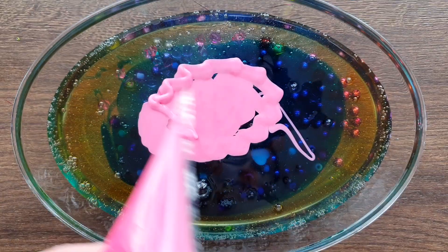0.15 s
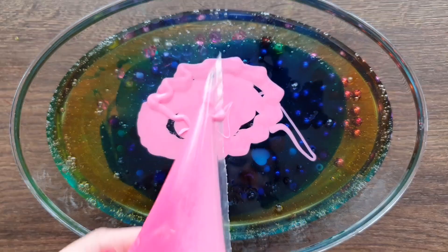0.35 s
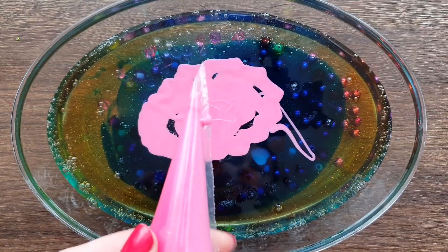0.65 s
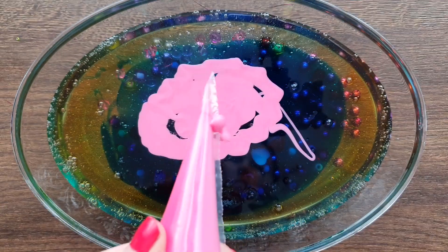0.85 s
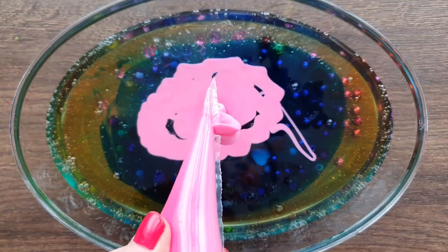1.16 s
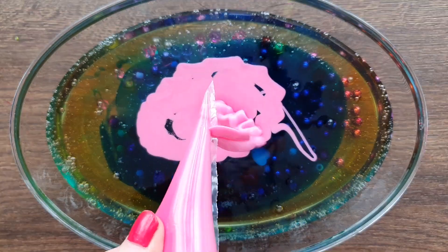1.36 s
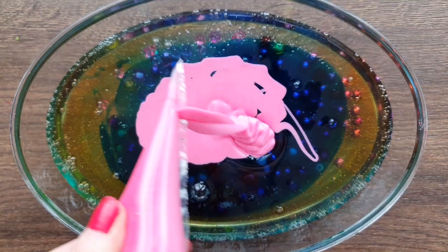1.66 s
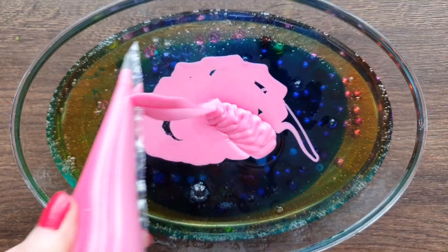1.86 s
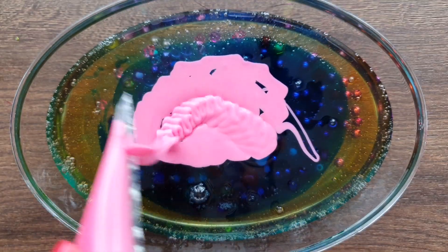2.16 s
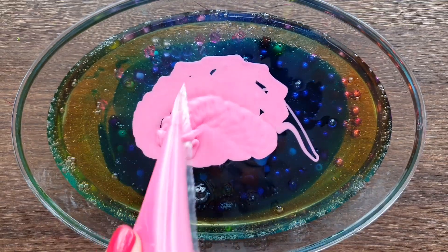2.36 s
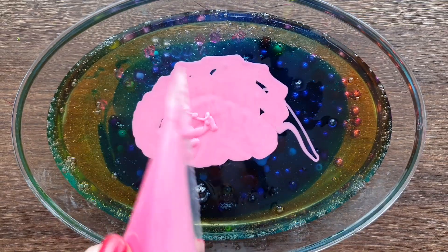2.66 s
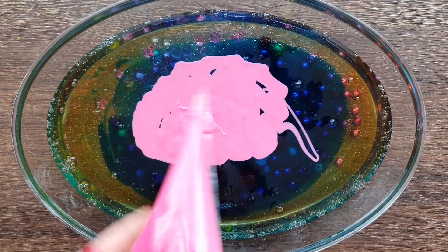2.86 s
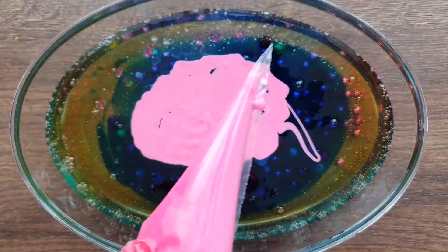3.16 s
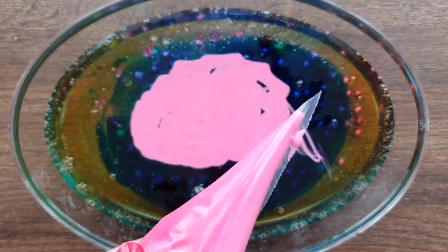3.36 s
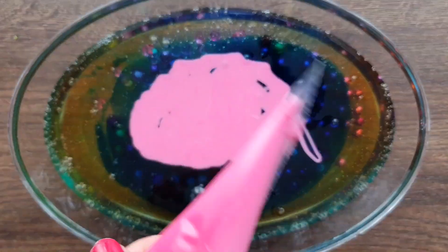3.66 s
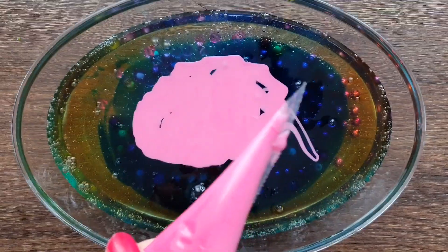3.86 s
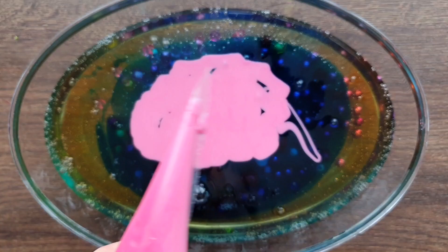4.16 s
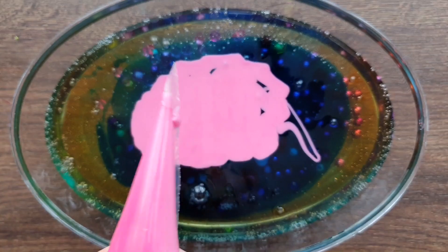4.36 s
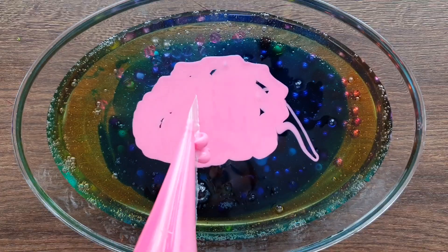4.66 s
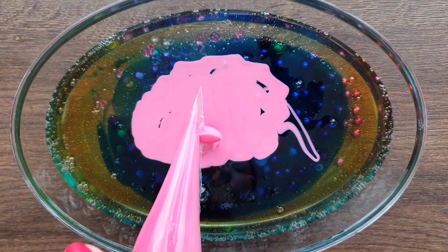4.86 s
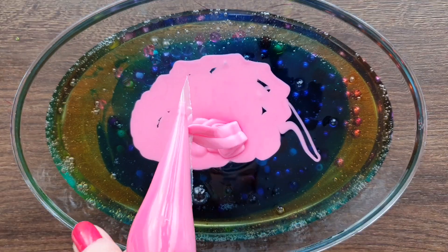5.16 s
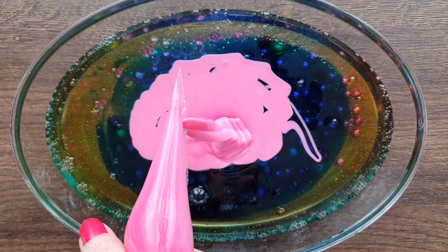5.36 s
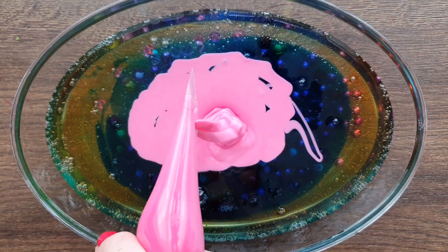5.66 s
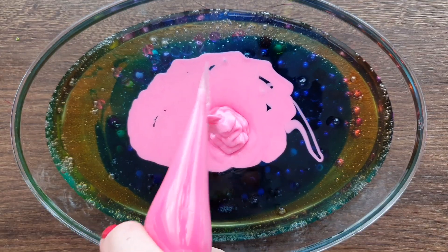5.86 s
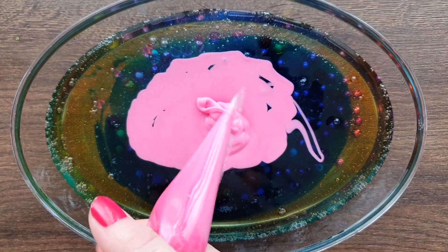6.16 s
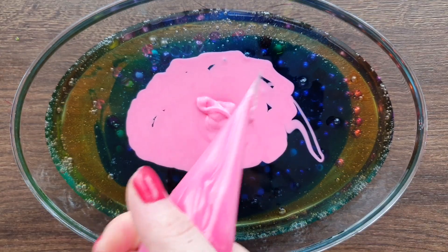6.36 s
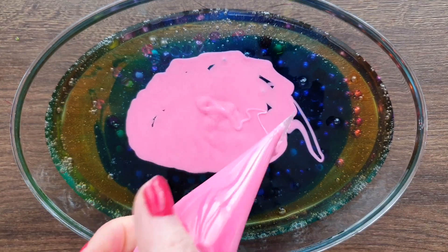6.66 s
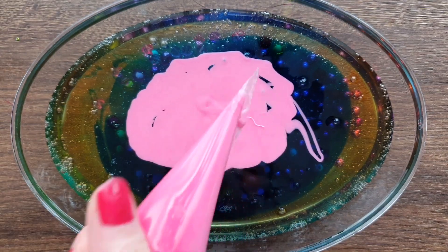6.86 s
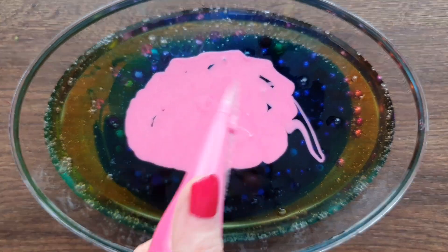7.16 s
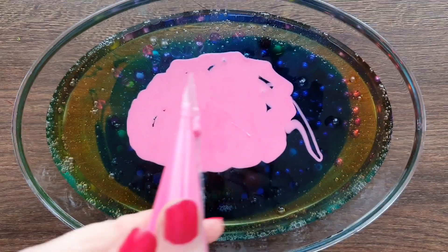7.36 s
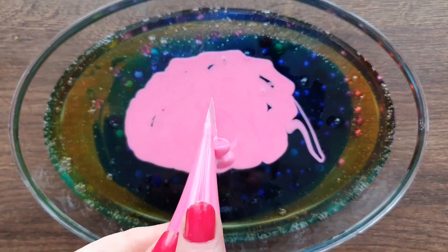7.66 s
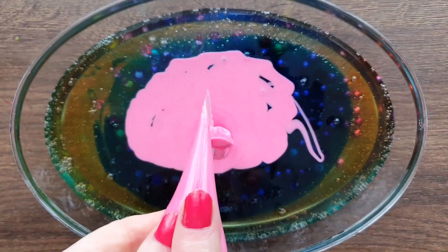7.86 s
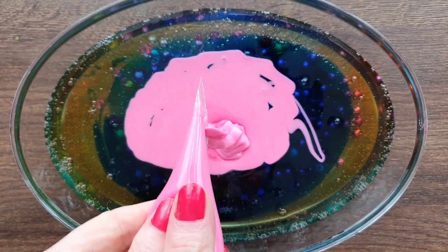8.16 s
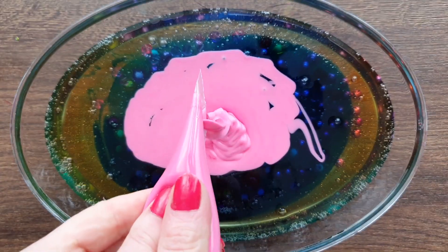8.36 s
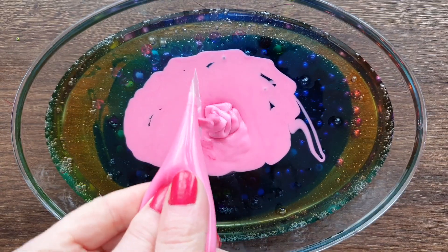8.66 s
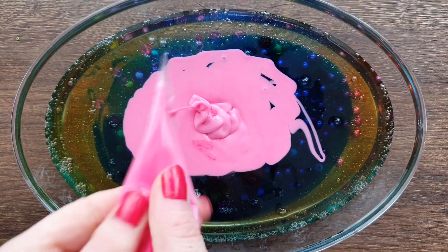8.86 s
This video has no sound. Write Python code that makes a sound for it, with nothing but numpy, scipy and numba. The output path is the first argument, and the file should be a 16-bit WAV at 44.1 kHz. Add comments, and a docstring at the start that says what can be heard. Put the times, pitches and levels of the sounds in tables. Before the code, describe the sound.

Thin plastic film ticks and rustles in scattered bursts close by, then one very loud sharp double crack, over a faint distant motor hum.

```python
"""A thin plastic piping bag is kneaded by hand just left of a stereo microphone, over a glass bowl on a table.
Creases in the film buckle as short ticks over a fine rustle, all built from damped sines; a taut fold cracks
loudly in runs of slips. The paste plops, fingers squeak, and noise-driven low modes make the table shudder.
Decaying noise bands form a small room's echo; a motor hums far off in harmonics over quiet shaped noise."""
import sys
import numpy as np
from scipy import signal
from scipy.fft import rfft, irfft, next_fast_len
from scipy.io import wavfile
from scipy.ndimage import uniform_filter1d
from numba import njit

SR = 44100
rng = np.random.default_rng(int(sys.argv[2]) if len(sys.argv) > 2 else 0)


def log_audio(samples):
    """Write samples as a 16-bit WAV file to the path given in sys.argv[1]."""
    # one column per channel
    frames = np.atleast_2d(samples).T
    # limit to full scale, then quantise
    limited = np.clip(frames, -1, 1)
    pcm = np.round(limited * 32767).astype(np.int16)
    wavfile.write(sys.argv[1], SR, pcm)


N = 397782  # length in samples


def undb(db):
    """Decibels to gain."""
    return 10 ** (np.asarray(db) / 20)


def curve(rows):
    """Draw each column of a time table as a sample-by-sample line."""
    s, *columns = np.transpose(rows)
    return [np.interp(np.arange(N) / SR, s, c) for c in columns]


def band(x, hz, width):
    """Resonant band-pass, gain 1 at the centre."""
    return signal.lfilter(*signal.iirpeak(min(hz, .45 * SR), hz / width, SR), x)


def walk(rate):
    """Random levels held 1 / rate s and smoothed twice; spread near 1."""
    hold = int(SR / rate)
    steps = np.repeat(rng.standard_normal(N // hold + 1), hold)
    return 1.395 * uniform_filter1d(uniform_filter1d(steps, hold), hold)[:N]


def swells(s, start, held, rise, fall):
    """Level in dB below full of each attack-hold-release shape at times s, one column per shape."""
    s = s[:, None]
    return -rise * np.maximum(start - s, 0) - fall * np.maximum(s - start - held, 0)


@njit
def ring(start, hz, t60, size, turn, rise_s, n):
    """Sum of damped sines, each a rotating, shrinking phasor with a smooth rise."""
    out = np.zeros(n)
    for k in range(len(start)):
        rotation = np.exp(2j * np.pi * hz[k] / SR - np.log(1000.) / (t60[k] * SR))
        phasor = size[k] * np.exp(1j * turn[k])
        first, rise = 0., 0.
        step = min(2 / (rise_s[k] * SR), 1.)
        for i in range(max(start[k], 0), min(start[k] + int(.8 * t60[k] * SR), n)):
            first += (1 - first) * step
            rise += (first - rise) * step
            out[i] += rise * phasor.imag
            phasor *= rotation
    return out


RIGHT_LAG_S = 0.00018


def heard(s, hz, t60, db, pan_db, rephase=1.2, lag_s=RIGHT_LAG_S, rise_cycles=1., longest_rise_s=.0005):
    """Damped grains at both ports: the right one hears them later, re-phased, and panned by level."""
    s, hz, t60, db, pan_db = (np.ravel(v) * 1. for v in np.broadcast_arrays(s, hz, t60, db, pan_db))
    turn = rng.uniform(0, 2 * np.pi, len(s))
    right_turn = turn + rephase * rng.standard_normal(len(s))
    hz = np.minimum(hz, .45 * SR)
    rise_s = np.minimum(rise_cycles / hz, longest_rise_s)
    left_start = (s * SR).astype(np.int64)
    right_start = ((s + lag_s) * SR).astype(np.int64)
    left = ring(left_start, hz, t60, undb(db + pan_db / 2), turn, rise_s, N)
    right = ring(right_start, hz, t60, undb(db - pan_db / 2), right_turn, rise_s, N)
    return np.array([left, right])


# Patches jolted by one crease: three of film, two of the filled body, three small ones.
# Each row: gain in dB added to the crease's own level, t60 in seconds before a random stretch.
CREASE_PATCHES = [(9, 0.0043), (7, 0.0038), (6.5, 0.0046), (4, 0.0074), (5, 0.0023), (11.5, 0.00084),
                  (-3, 0.0036), (-13.5, 0.016)]


def buckle(s, db, hz, below_db, above_db, body_db, body_hz, high_db, pan_db, spread_s):
    """Each crease jolts the film at and around its pitch, the filled body below and small patches above."""
    count = len(CREASE_PATCHES)
    u, wait, last = np.moveaxis(rng.random((len(s), 3, count)), 1, 0)
    below = 0.62 + 0.23 * u[:, 1]
    above = 1.176 + 0.33 * u[:, 2]
    deep = 0.37 + 0.4 * u[:, 4]
    small_hz = 8000 * 2 ** ((np.arange(3) + u[:, 5:]) / 3)  # one in each third of the octave
    pitch = np.column_stack([hz, hz * below, hz * above, body_hz, body_hz * deep, small_hz])
    patch_db, t60 = np.transpose(CREASE_PATCHES)
    level_db = np.column_stack([db, below_db, above_db, body_db, body_db, high_db, high_db, high_db])
    # the first patch is on time, the others trail at random
    late = -spread_s * np.log(1 - .95 * wait) * (np.arange(count) > 0)
    return heard(s[:, None] + late, pitch, t60 * (0.71 + 0.74 * last), level_db + patch_db,
                 pan_db[:, None], rise_cycles=1.47, longest_rise_s=0.00031)


# Where the hand holds the bag.
# Each row: time in seconds, left minus right in dB, pitch of the filled body in Hz.
HAND_GRIP = [(0, 4, 1800), (.7, 5.5, 1580), (2.45, 6.5, 2130), (3.5, 16, 2000), (4.2, 14.5, 2500),
             (6.0, 9, 2240), (6.38, 8.5, 2410), (6.8, 12, 2410), (7.1, 9.5, 2630), (7.4, 2, 1660),
             (9.02, 2.5, 1766)]


def grip(s):
    """Stereo place and body pitch at times s, gliding from one hold to the next."""
    t, pan_db, hz = np.transpose(HAND_GRIP)
    return np.interp(s, t, pan_db), np.interp(s, t, hz)


# Shifts of the fingers that rustle the film; grain, scatter and patch gains add to the levels.
# Each row: full from in seconds, held in seconds, film level in dB, film pitch in Hz before scatter,
# body level in dB, high part level in dB.
FINGER_SHIFTS = [(0.0, 0.11, -60.5, 5100, -70, -54), (.135, 0.01, -61.5, 6860, -75, -63),
                 (.274, 0.044, -64.5, 5900, -70.5, -73), (0.558, 0.012, -62.5, 5000, -63, -57.5),
                 (0.631, 0.015, -59, 4300, -73, -89), (.94, 0.009, -75.5, 4330, -77, -95),
                 (2.37, .03, -74, 4700, -84, -74), (2.433, 0.069, -56.5, 5280, -57, -58),
                 (2.55, 0.12, -63.5, 5800, -72.5, -69), (2.817, 0.0066, -61.5, 5850, -81, -83),
                 (3.0, 0.022, -74, 5500, -72, -99), (3.16, 0.054, -79, 5470, -76, -82),
                 (3.315, 0.0066, -76.5, 3550, -92, -74), (3.489, 0.0062, -67, 3840, -93, -72),
                 (3.7, .25, -80.5, 4030, -89, -78), (4.01, 0.11, -70.5, 5000, -71.5, -91),
                 (4.12, 0.034, -66.5, 4700, -64, -63.5), (4.3, 0.14, -74.5, 4300, -78, -97),
                 (5.32, 0.08, -94, 4080, -98, -69.5), (5.676, 0.027, -72.5, 5230, -84, -70),
                 (5.98, .06, -66, 4900, -94, -89), (6.07, 0.046, -50, 3800, -56, -48.5),
                 (6.2, .06, -57.5, 4200, -70, -57), (6.3, 0.054, -57, 4300, -62, -51),
                 (6.57, 0.038, -63.5, 5100, -72, -66), (6.691, 0.023, -58.5, 4330, -61, -60.5),
                 (6.78, 0.11, -63, 4600, -64.5, -61.5), (6.95, 0.068, -60, 5330, -65, -61),
                 (7.054, 0.0088, -52, 5660, -50, -50), (7.087, 0.006, -56.5, 5930, -52, -62),
                 (7.34, 0.026, -70.5, 4900, -68, -85), (7.6, 0.0094, -73, 5140, -69, -89),
                 (7.859, 0.014, -73, 5270, -70, -64.5), (6.372, 0.018, -59.5, 3960, -65, -65),
                 (7.95, .11, -70, 6400, -75, -66), (8.21, 0.043, -79, 4860, -71.5, -61),
                 (8.58, 0.078, -82.5, 6200, -79, -65.5), (8.75, 0.066, -69, 4750, -85, -61),
                 (8.84, 0.12, -52.5, 4900, -58, -59)]
SHIFT_RISE_DB_S, SHIFT_FALL_DB_S = 436, 218
SWARM_BELOW_DB, SWARM_ABOVE_DB = -1, 0  # film below and above its pitch, re the film level
RUSTLE_PAN_DB = 3.5  # further left than the grip
RUSTLE_SCATTER_DB = 3.5  # scale of the random boost per grain


def swarm(count, grain_db, spread_s):
    """Creases at random times; the strongest finger shift of the moment sets their size and pitch."""
    start, held, db, hz, body_db, high_db = np.transpose(FINGER_SHIFTS)
    chance = rng.random((count, 4))
    s = chance[:, 0] * N / SR
    shape = swells(s, start, held, SHIFT_RISE_DB_S, SHIFT_FALL_DB_S)
    k = np.argmax(shape + np.maximum(db, high_db), axis=1)
    boost_db = -RUSTLE_SCATTER_DB * np.log(1 - .96 * chance[:, 1])
    size_db = shape[np.arange(count), k] + grain_db + boost_db
    pan_db, body_hz = grip(s)
    film_hz = hz[k] * 2.19 ** (chance[:, 2] - .5)
    body_hz = body_hz * 1.59 ** (chance[:, 3] - .5)
    film_db = db[k] + size_db
    return buckle(s, film_db, film_hz, film_db + SWARM_BELOW_DB, film_db + SWARM_ABOVE_DB,
                  body_db[k] + size_db, body_hz, high_db[k] + size_db, pan_db + RUSTLE_PAN_DB, spread_s)


def rustle():
    """A dense swarm of tiny creases and a sparse one of stronger, tighter ticks."""
    fine = swarm(count=11000, grain_db=-12.5, spread_s=0.0027)
    ticks = swarm(count=1000, grain_db=-6.5, spread_s=0.00072)
    return fine + ticks


# Low resonances of the table.
# Each row: pitch in Hz, width in Hz, level in dB relative to the other mode.
TABLE_MODES = [(46, 20, -3.5), (78, 24, 0)]
# Knocks through the table.
# Each row: full from in seconds, held in seconds, level in dB.
TABLE_KNOCKS = [(1.2, 0.25, -83), (4.48, 0.018, -70), (6.31, 0.14, -55), (6.68, 0.082, -71),
                (8.4, 0.015, -72)]
KNOCK_RISE_DB_S, KNOCK_FALL_DB_S = 344, 149
RUMBLE_DB, RUMBLE_WANDER_DB = -80, 2


def shudder():
    """Low table modes pushed by noise, nearly alike at both ports: a wandering rumble and a few knocks."""
    push = rng.standard_normal(N) + .22 * rng.standard_normal((2, N))
    low = sum(undb(db) * band(band(push, hz, width), hz, 0.52 * width) for hz, width, db in TABLE_MODES)
    start, held, db = np.transpose(TABLE_KNOCKS)
    knock_db = db + swells(np.arange(N) / SR, start, held, KNOCK_RISE_DB_S, KNOCK_FALL_DB_S)
    knocks = undb(knock_db).sum(axis=1)
    rumble = undb(RUMBLE_DB + RUMBLE_WANDER_DB * walk(4.4))
    return low / np.std(low) * (knocks + rumble)


# Course of the far motor, before its small wander.
# Each row: time in seconds, strongest line in Hz, its level in dB, throb depth 0-1.
MOTOR_COURSE = [(0, 627.7, -71, .38), (2.5, 626.6, -71.5, .26), (4.9, 626.5, -71.5, .24),
                (5.15, 624.1, -69, .08), (9.02, 624.2, -69.5, .13)]
# Lines of the hum.
# Each row: multiple of the blade rate, level in dB relative to the strongest line.
MOTOR_LINES = [(2, -15), (9, -19), (10, -17), (11, 0), (16, -21), (18, -16), (19, -24), (21, -25)]


def motor():
    """Multiples of a four-blade rate, the eleventh strongest; the sound throbs once a shaft turn."""
    hz, db, depth = curve(MOTOR_COURSE)
    blade_hz = hz / 11 * (1 + .0008 * walk(6))
    blade = 2 * np.pi * np.cumsum(blade_hz) / SR
    throb = 1 + depth * np.cos(blade / 4 + 2.9)
    lines = sum(undb(d) * np.sin(k * blade + rng.uniform(0, 2 * np.pi)) for k, d in MOTOR_LINES)
    hum = np.sqrt(2) * lines * throb * undb(db + 1.55 * walk(7))
    # from the right: the left port hears it five samples later and weaker
    both = np.array([np.roll(hum, 5), hum])
    return both * undb([[-.6], [.6]])


# Colour of the room and microphone noise, whose overall level is set by AIR_DB.
# Each row: frequency in Hz, relative density in dB per Hz.
AIR_COLOUR = [(100, -20), (190, -25.5), (480, -29), (620, -20), (800, -27.5), (1050, -26), (1300, -33.5),
              (1800, -37), (4000, -39), (7700, -45), (12300, -41), (13500, -51), (16000, -59.5)]
AIR_DB = -73.5


def air():
    """Steady room and microphone noise: partly alike left and right in the bass, unrelated in the treble."""
    size = next_fast_len(N)
    hz = np.maximum(np.fft.rfftfreq(size, 1 / SR), 1)
    colour_hz, colour_db = np.transpose(AIR_COLOUR)
    gain = undb(np.interp(np.log(hz), np.log(colour_hz), colour_db))
    gain = gain * np.minimum(hz / 100, 1) ** 2  # roll off the deep bass
    alike = np.clip(.6 - hz / 1800, 0, 1)
    mid, side = rfft(rng.standard_normal((2, size)))
    both = np.sqrt(1 + alike) * mid + np.sqrt(1 - alike) * side * np.array([[1], [-1]])
    noise = irfft(gain * both, size)[:, :N]
    return noise / np.std(noise) * undb(AIR_DB)


# Creases that buckle clearly; the patch gains add to all levels.
# Each row: start in seconds, film level in dB, film pitch in Hz, film below in dB, film above in dB,
# body level in dB, body pitch in Hz, high part in dB, left minus right in dB.
SINGLE_CREASES = [(0.046, -48, 4570, -50, -47, -72, 2160, -44, 14.5),
                  (0.07, -51, 4180, -73, -52, -74, 1010, -45, 7),
                  (0.0915, -57, 5050, -66, -49, -75, 1010, -48, 2),
                  (0.0982, -51, 7100, -55, -65, -78, 1030, -43, -6),
                  (0.1446, -43, 7600, -55, -64, -71, 1590, -52, 1),
                  (0.153, -56, 4360, -55, -67, -59, 2400, -55, 6),
                  (0.3576, -37.5, 6080, -76, -39, -51.5, 2550, -34, 3),
                  (0.4278, -60, 5840, -55, -58, -55, 1410, -56, 8),
                  (0.4642, -65, 4430, -56.5, -60, -54.5, 1390, -71, 11),
                  (0.5582, -55, 6870, -62, -72, -53, 1700, -69, 3),
                  (0.6256, -34.5, 4100, -55, -46, -55, 1560, -62, 6),
                  (0.631, -42, 4560, -58, -59, -40, 1460, -78, 2),
                  (0.6364, -51, 3760, -64, -66, -44, 1470, -72, 15),
                  (0.6715, -35, 3830, -50, -46, -48, 1460, -67, 7),
                  (0.7997, -63, 3420, -59, -83, -46.5, 1070, -77, 9),
                  (0.9008, -65, 4970, -62, -81, -68, 1740, -85, 10),
                  (2.4238, -55, 4630, -62, -68, -63, 2170, -73, 8),
                  (2.4341, -54, 4230, -71, -59, -55, 2200, -61, 1),
                  (2.4413, -54, 5250, -54, -66, -66, 1740, -58, 14),
                  (2.4472, -61, 2500, -55, -65, -55.5, 1630, -63, 6),
                  (2.4537, -46, 4460, -57, -61, -62, 2130, -52, 10),
                  (2.4596, -50, 2910, -54, -53, -44, 2280, -55, 8),
                  (2.4885, -56, 5750, -59, -64, -54, 1750, -52, 1),
                  (2.4997, -43.5, 4400, -61, -47, -55, 1850, -35, 9),
                  (2.503, -44, 7160, -50, -53, -48, 1780, -48, -4),
                  (2.5101, -40.5, 7300, -51, -44, -56, 2150, -45, 8),
                  (2.5202, -55, 7170, -61, -51, -56, 1810, -51, 1),
                  (2.5277, -52, 4440, -64, -54, -70, 1960, -61, 11),
                  (2.5491, -54, 4800, -63, -49, -73, 2070, -39.5, 13),
                  (2.5873, -50, 7280, -60, -58, -68, 2370, -55, -3),
                  (2.611, -62, 6570, -68, -61, -76, 2480, -64, -2),
                  (2.633, -47, 4800, -68, -50, -79, 2130, -62, 8),
                  (2.8215, -52, 5800, -74, -60, -85, 1530, -70, 5),
                  (2.8274, -55, 6340, -53, -66, -83, 1010, -69, 4),
                  (2.8456, -52, 5760, -71, -55, -78, 1010, -73, 10),
                  (3.4773, -50, 6700, -52.5, -55.5, -60.5, 1240, -46, 12),
                  (3.4801, -58, 6640, -48, -63, -67, 1300, -62, 16),
                  (3.5252, -52.5, 4310, -56, -53.5, -63, 1070, -71, 16.5),
                  (3.9731, -55, 5100, -54.5, -66, -60, 2570, -74, 7.5),
                  (4.0168, -48.5, 5270, -50, -58, -52, 2470, -52, 6.5),
                  (4.082, -55, 4040, -62, -61, -62, 2530, -61, 9),
                  (4.2825, -63, 5950, -59, -67, -55.5, 2400, -57, 6),
                  (4.3019, -56.5, 5900, -63, -64, -67, 2370, -56, 3),
                  (4.3541, -51, 4500, -59, -51, -57, 2570, -58, 2),
                  (4.3645, -59, 3870, -57, -59, -48, 1700, -93, 6),
                  (4.4148, -60, 6760, -54, -61, -76, 1380, -64, 5),
                  (4.6303, -61.5, 6630, -66, -77, -81, 1010, -65, 6),
                  (5.6664, -43, 6940, -55, -46.5, -62, 990, -42, 5),
                  (5.6695, -55, 4000, -75, -54, -79, 1010, -42, 4),
                  (5.962, -59, 4390, -83, -67, -76, 1010, -75, 14),
                  (6.0344, -59, 5370, -71, -63, -67, 1010, -84, 20),
                  (6.0503, -38.5, 4080, -38.5, -40.5, -53, 1760, -38.5, 12),
                  (6.081, -42, 2960, -56, -49, -60, 2000, -43, 6),
                  (6.101, -47, 5080, -46, -40, -64, 2280, -48, 5),
                  (6.1128, -35, 3700, -50, -36, -34.5, 2250, -49, 6.5),
                  (6.1283, -45, 4370, -46, -49, -50, 2540, -41, -1),
                  (6.136, -54, 5300, -53, -49, -69, 2480, -59, 11),
                  (6.148, -49, 2750, -67, -48, -52, 2540, -43, 9),
                  (6.1516, -44, 6570, -50, -54, -60, 2000, -52, 2),
                  (6.1675, -51, 5880, -55, -61, -61, 2540, -56, 8),
                  (6.189, -51, 6400, -54, -61, -71, 1720, -63, 2),
                  (6.205, -44, 6720, -52, -49, -61, 2540, -45, 5),
                  (6.2137, -49, 5200, -39, -42, -58, 2540, -41, 13.5),
                  (6.217, -46.5, 6800, -43, -46, -51, 2660, -45, 14),
                  (6.2243, -51, 3960, -66, -58, -84, 1100, -54, 13),
                  (6.2499, -53, 5100, -52, -46, -62, 2370, -42, 10),
                  (6.2642, -32.5, 4950, -34.5, -46, -45.5, 2530, -47, 8.5),
                  (6.29, -51, 5070, -40, -37.5, -44, 1650, -42, 8),
                  (6.2935, -37, 3860, -49, -33, -41, 2360, -33, 10),
                  (6.3027, -48, 3950, -55, -54, -55, 2000, -43, 8),
                  (6.319, -58, 3830, -72, -61, -61, 2330, -49, 11),
                  (6.3284, -53, 3600, -55, -56, -57, 2280, -62, 9),
                  (6.337, -50, 4690, -59, -54, -78, 2130, -43, 8),
                  (6.3437, -63, 6950, -60, -60, -74, 2540, -45, 13),
                  (6.357, -56, 4400, -71, -60, -78, 1440, -53, 4),
                  (6.3767, -45, 3970, -55, -59, -63, 2540, -50, 22),
                  (6.381, -48, 4340, -56, -49, -67, 2300, -43, 21),
                  (6.3856, -29.5, 4440, -33.5, -40, -36, 1760, -31, 10),
                  (6.3946, -53, 4160, -54, -57, -57, 2110, -45, 13),
                  (6.5881, -65, 6360, -71, -62, -80, 1010, -70, 6),
                  (6.598, -63, 6030, -75, -64, -61, 1020, -69, 8),
                  (6.6423, -56, 5930, -77, -61, -57, 1690, -78, 13),
                  (6.6468, -50.5, 3200, -65, -47, -63, 2360, -68, 15.5),
                  (6.6696, -61, 3880, -75, -52, -69, 2330, -65, 8),
                  (6.679, -50.5, 3300, -73, -67, -64, 1660, -76, 17),
                  (6.6957, -43, 3200, -67, -58, -50.5, 1640, -58, 8.5),
                  (6.7067, -65, 3170, -74, -60, -54, 1430, -61, 12),
                  (6.7112, -58, 2970, -77, -62, -65, 2540, -47, 6),
                  (6.7443, -62, 7140, -64, -65, -66, 1700, -47, 10),
                  (6.7528, -53, 5860, -50, -67, -65, 2540, -67, 11),
                  (6.7622, -53, 3080, -68, -66, -65, 1640, -74, 17),
                  (6.7681, -70, 5760, -64, -71, -70, 2500, -47, 13),
                  (6.828, -44, 3100, -59, -51, -45.5, 2300, -67, 12),
                  (6.8363, -57, 5700, -61, -57, -68, 2130, -58, 14),
                  (6.8417, -43, 2940, -45, -43, -59, 2550, -63, 12),
                  (6.8696, -59, 6560, -45.5, -57, -63, 1680, -50, 16.5),
                  (6.8889, -62, 6420, -63, -58, -60, 2000, -62, 12),
                  (6.8923, -58, 5120, -67, -64, -75, 2540, -60, 17),
                  (6.9341, -61, 6590, -72, -65, -74, 2200, -62, 20),
                  (6.942, -60, 3060, -72, -54, -63, 2550, -72, 17),
                  (6.9463, -54, 5270, -56, -67, -66, 2300, -74, 16),
                  (6.9555, -46, 2950, -78, -53, -51.5, 1220, -53, 11.5),
                  (6.9596, -56, 6300, -62, -51, -79, 1380, -63, 15),
                  (6.9973, -41, 3020, -63, -43, -50, 2630, -51, 9),
                  (7.014, -47, 3840, -62, -50, -72, 2500, -67, 11),
                  (7.0531, -54, 7080, -55, -52, -57.5, 1300, -42.5, 14),
                  (7.0635, -44, 6600, -50, -50, -45, 2420, -59, 13),
                  (7.0905, -57, 5330, -47, -48, -46, 1460, -58, 14),
                  (7.0945, -45, 5940, -47, -61, -48, 1690, -43, 13),
                  (7.1005, -43, 6340, -56, -42, -44, 2400, -47, 5),
                  (7.1025, -52, 5140, -42, -45, -39, 1660, -44, 5),
                  (7.3276, -58, 4500, -58, -64, -55, 1190, -76, 7),
                  (7.5925, -59, 2530, -66, -69, -56, 1820, -72, 6),
                  (7.8555, -63.5, 4230, -74, -66, -60, 1890, -65, 5),
                  (7.8665, -82, 3360, -75, -77, -47, 1770, -75, 4.5),
                  (7.9465, -50.5, 6670, -73, -65, -80, 1010, -46.5, 9),
                  (8.03, -61, 6800, -56, -68, -53.5, 1580, -76, 6),
                  (8.7588, -67, 5900, -72, -72, -54, 1800, -61, 4),
                  (8.7898, -65, 5560, -86, -84, -59, 1870, -79, 7),
                  (8.8027, -51, 5800, -74, -63, -65, 1950, -63, 14.5),
                  (8.8367, -53, 7580, -55, -63, -60, 1680, -55, 6),
                  (8.842, -52, 5070, -67, -56, -74, 1010, -58, 5),
                  (8.8535, -42, 4400, -67, -45, -75, 1850, -45, 11),
                  (8.8583, -47, 5000, -63, -53, -65, 2020, -46, 12),
                  (8.8624, -45, 4350, -59, -51, -70, 2000, -52, 8),
                  (8.8874, -47, 5400, -53, -45, -62, 1890, -47, 1),
                  (8.8907, -34, 4600, -49, -43, -48, 1610, -37, 7),
                  (8.9173, -38.5, 4540, -34.5, -40.5, -45, 1730, -38.5, 6.5),
                  (8.9204, -43, 4930, -52, -41, -59, 1680, -39, 5),
                  (8.933, -43, 3730, -62, -63, -49, 1790, -58, 4),
                  (8.9606, -50, 5900, -59, -51, -51, 1770, -38, 5),
                  (8.966, -49, 3020, -57, -44, -52, 1720, -53, 8),
                  (8.9815, -55, 3340, -78, -62, -76, 1890, -60, 5),
                  (8.9916, -41, 4290, -51, -48, -51, 1780, -41.5, 8),
                  (9.0086, -54, 3750, -66, -54, -75, 1890, -57, 12),
                  (.406, -59, 4800, -64, -61, -58, 2500, -64, 11),
                  (0.37, -61, 2700, -68, -71, -60, 1500, -78, 9),
                  (.575, -70, 4800, -72, -74, -55, 1600, -76, 10),
                  (2.561, -54, 4100, -68, -60, -68, 2300, -60, -2),
                  (2.602, -61, 7500, -64, -66, -64, 2400, -66, 9),
                  (2.6625, -55, 4100, -55, -56, -72, 2900, -57, 14),
                  (3.2, -62, 6940, -70, -63, -79, 890, -58, 7),
                  (3.304, -59, 3300, -64, -72, -61, 820, -60, 15),
                  (3.858, -72, 2700, -72, -78, -63, 1000, -85, 11),
                  (6.068, -51, 5450, -54, -52, -47.0, 1350, -60, 11),
                  (8.052, -62, 5900, -72, -68, -65, 1600, -53, 8),
                  (8.105, -64, 5630, -73, -72.5, -73, 1600, -74, 8),
                  (12.0, -69, 7500, -84, -62.5, -82, 1600, -64, 7),
                  (8.612, -53, 7530, -72, -56, -71, 970, -53, 8),
                  (6.3735, -49, 3800, -52, -52, -60, 2400, -52, 12),
                  (2.5515, -46, 4300, -69, -54, -66, 1900, -54, 9.5),
                  (2.4645, -52, 4500, -60, -60, -56, 2000, -53, 9),
                  (2.592, -71, 2600, -72, -68, -52, 2330, -68, 11),
                  (6.2815, -57, 4100, -60, -65, -64, 2300, -61, 10),
                  (2.534, -64, 2900, -68, -66, -55, 1900, -62, 4)]


def creases():
    """The single ticks: all patches of a crease start within about two milliseconds."""
    return buckle(*np.transpose(SINGLE_CREASES), spread_s=.0006)


# Diffuse echo of the small room.
# Each row: band centre in Hz, t60 in seconds, level in dB relative to the other bands.
ROOM_BANDS = [(490, 0.3, -4), (1470, 0.24, -13), (4300, 0.42, -12), (9130, 0.36, -11), (13650, 0.26, -8)]
ROOM_DB = -16.5
ROOM_PATCHY_DB = 0.5  # separate reflections make the echo uneven


def room(x):
    """Diffuse echo: broad, patchy bands of noise that die away, unrelated at the two ports."""
    t = np.arange(int(.45 * SR)) / SR
    tail = np.zeros((2, len(t)))
    for hz, t60, db in ROOM_BANDS:
        noise = band(rng.standard_normal((2, len(t))), hz, 1.52 * hz)
        patchy_db = ROOM_PATCHY_DB * walk(153.4)[:len(t)]
        tail += noise * undb(db - 60 * t / t60 + patchy_db)
    tail = tail * np.clip(t / 0.006, 0, 1)  # the walls answer a little late
    tail = tail / np.sqrt(np.sum(tail ** 2, axis=1, keepdims=True))
    sent = x[:1] + .5 * x[1:]
    return undb(ROOM_DB) * signal.fftconvolve(sent, tail, axes=1)[:, :N]


# Soft plops of the paste.
# Each row: start in seconds, level in dB, pitch in Hz.
PASTE_PLOPS = [(0.469, -66, 620), (0.6363, -37, 1350), (0.7996, -46, 990), (3.861, -52.5, 664),
               (6.385, -34.5, 695), (7.096, -55, 905), (8.63, -46, 587)]


def plops():
    """Short dull rings of air trapped in the paste; each dies away in a few cycles."""
    s, db, hz = np.transpose(PASTE_PLOPS)
    return heard(s, hz, 5 / hz, db, 4.4, rephase=0.14, longest_rise_s=0.000072)


# Fingers squeak on the filled body.
# Each row: start in seconds, length in seconds, from pitch in Hz, to pitch in Hz, level per slip in dB.
FINGER_SQUEAKS = [(2.428, .04, 2260, 2330, -58), (2.55, 0.053, 2260, 2390, -65.5),
                  (2.606, 0.077, 2400, 2720, -71), (8.759, 0.056, 1780, 1780, -63.5)]
SQUEAK_T60_S, SQUEAK_SCATTER = 0.021, 0.014  # scatter is a share of the pitch


def squeaks():
    """Quick uneven slips keep the body ringing while its pitch glides or holds."""
    start, length, from_hz, to_hz, db = np.transpose(FINGER_SQUEAKS)[:, :, None]
    shape = (len(FINGER_SQUEAKS), 24)
    u, off = rng.random(shape), rng.standard_normal(shape)
    s = start + length * u
    hz = (from_hz + (to_hz - from_hz) * u) * (1 + SQUEAK_SCATTER * off)
    return heard(s, hz, SQUEAK_T60_S, db, grip(s)[0], longest_rise_s=.002)


# The taut fold gives way three times, each time in a run of slips; the mode levels add to these.
# Each row: strongest slip in seconds, its level in dB.
CRACK_RUNS = [(8.3714, -13), (8.3726, -10.5), (8.3802, -23.5)]
# What the taut fold rings with.
# Each row: pitch in Hz, level in dB re the slip, t60 in seconds, detuning from slip to slip as a share
# of the pitch, level toward the walls in dB re the slip before the echo send.
FOLD_MODES = [(70, -39, 0.04, 0.7, -30), (230, -59.5, 0.014, 0.6, -57), (980, -24.5, 0.0097, 0.07, -28.5),
              (1870, -31, 0.0071, 0.22, -33.5), (2860, -25.5, 0.008, 0.05, -38),
              (4160, -19, 0.0057, 0.11, -8), (5540, -17, 0.0032, 0.14, -17), (6860, -6, 0.005, 0.09, -11.5),
              (8420, -0.5, 0.0045, 0.18, -3), (9740, -3, 0.0055, 0.2, -3), (11960, -18, 0.005, 0.05, -16.5),
              (13300, 2, 0.0073, 0.02, 4), (14370, -7, 0.0025, 0.03, -4.5)]
SLIP_GAP_S, SLIP_BUILD_DB, SLIP_FADE_DB = 0.00063, 4.5, 4  # build and fade are dB per slip
CRACK_PAN_DB, SLIP_PAN_DB = 2.5, 5  # left minus right, and its spread from slip to slip
CRACK_LAG_S = .000072


def crack():
    """Slips grow up to the strongest and fade; each rings the fold's modes, detuned and not quite together."""
    step = np.arange(-7, 7)
    peak_s, peak_db = np.transpose(CRACK_RUNS)[:, :, None]
    s = (peak_s + SLIP_GAP_S * step).reshape(-1, 1)
    drop_db = np.where(step < 0, -SLIP_BUILD_DB, SLIP_FADE_DB) * step
    db = (peak_db - drop_db).reshape(-1, 1)
    hz, mode_db, t60, detune, _ = np.transpose(FOLD_MODES)
    hz = hz * (1 + detune * rng.standard_normal((len(s), len(FOLD_MODES))))
    pan_db = CRACK_PAN_DB + SLIP_PAN_DB * rng.standard_normal(s.shape)
    s = s + .001 * (rng.random(hz.shape) - .5)
    return heard(s, hz, t60, db + mode_db, pan_db, rephase=0.444, lag_s=CRACK_LAG_S, rise_cycles=0.92)


CRACK_ECHO_DB = 9.5  # level sent to the walls, re the strongest slip
CRACK_ECHO_RING = .42  # off its axis the fold rings shorter: share of t60


def crack_echo():
    """What the walls receive of the crack: one broad jolt of the fold for each run of slips."""
    s, db = np.transpose(CRACK_RUNS)[:, :, None]
    hz, _, t60, _, mode_db = np.transpose(FOLD_MODES)
    sent_db = db + mode_db + CRACK_ECHO_DB
    return heard(s, hz, t60 * CRACK_ECHO_RING, sent_db, CRACK_PAN_DB, longest_rise_s=.0001)


def scene():
    """Bag sounds with their echo over table, motor and air."""
    bag = creases() + rustle() + squeaks() + plops()
    echo = room(bag + crack_echo())
    return bag + crack() + echo + shudder() + motor() + air()


TOP_HZ = 16300


def record(dry):
    """Loud peaks are softly rounded; the recorder's steep low-pass cuts the top."""
    rounded = .6 * np.tanh(dry / .6)
    return signal.sosfilt(signal.ellip(8, .2, 70, TOP_HZ, fs=SR, output="sos"), rounded)


dry = scene()
out = record(dry)
log_audio(out)
```